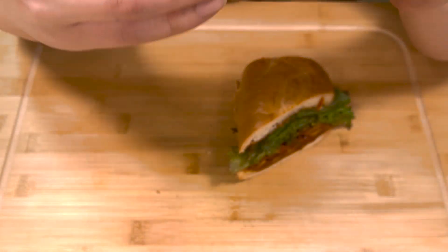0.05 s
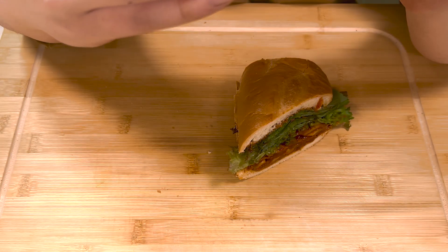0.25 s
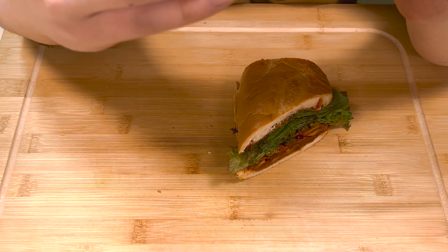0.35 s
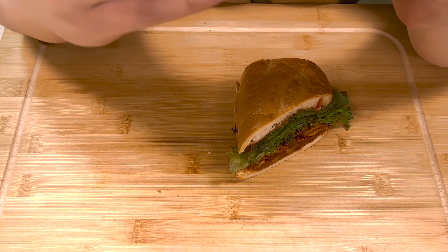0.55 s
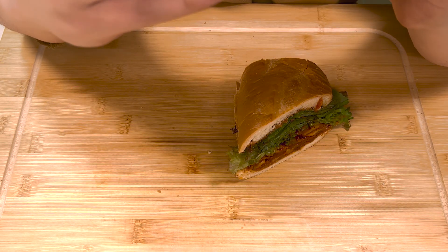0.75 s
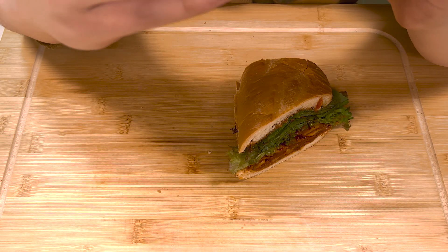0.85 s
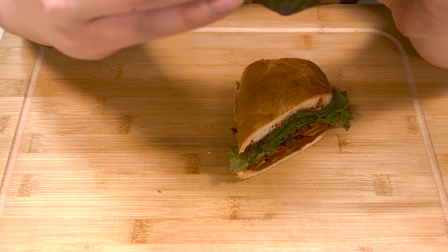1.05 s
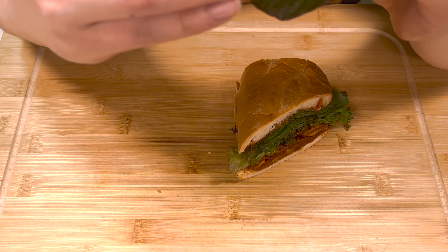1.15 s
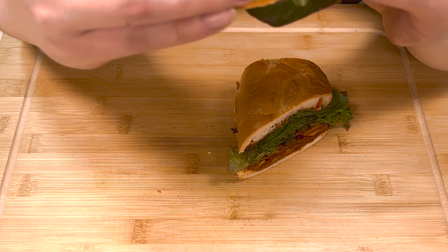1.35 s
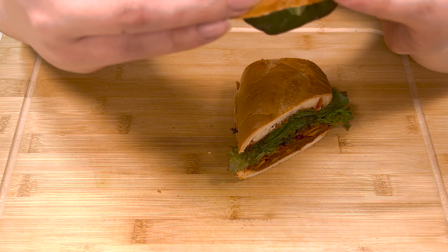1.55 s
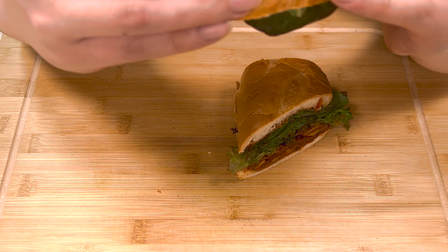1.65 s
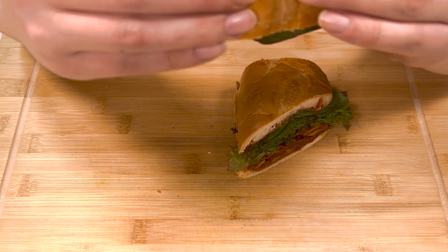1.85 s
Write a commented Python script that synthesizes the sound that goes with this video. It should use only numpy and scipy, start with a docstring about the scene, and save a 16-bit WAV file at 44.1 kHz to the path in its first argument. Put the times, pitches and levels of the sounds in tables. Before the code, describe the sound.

Crusty bread crunches close to the microphone as a sandwich is pressed by hand, first with crisp splintering cracks, then with deeper, sparser snaps that fade. A faint electrical hum lies underneath in the quiet kitchen.

```python
"""A quiet kitchen, the microphone close to two hands squeezing a crusty baguette sandwich.
The crust splits in sharp cracks, each with a knock of the loaf and a spray of splinters, over a bed
of tiny crumbling grains; a second squeeze gives duller, deeper snaps. The room answers briefly.
Two faint tones ring at the start, and mains hum and soft room noise lie underneath."""
import sys
import numpy as np
from scipy import signal
from scipy.fft import rfft, irfft, next_fast_len
from scipy.io import wavfile

SR = 44100
rng = np.random.default_rng(int(sys.argv[2]) if len(sys.argv) > 2 else 0)


def store_wav(level_fs):
    """Save 16-bit WAV to argv[1]."""
    pcm = np.round(np.clip(np.atleast_2d(level_fs), -1, 1) * 32767)
    wavfile.write(sys.argv[1], SR, pcm.T.astype(np.int16))


N = 83790


def amp(db):
    """Decibels to gain."""
    return 10 ** (np.asarray(db) / 20)


def unit(x):
    """Scale to rms 1."""
    return x / np.sqrt(np.mean(x ** 2) + 1e-20)


def along(points, hz):
    """Read a curve of (frequency, value) points on a log-frequency axis."""
    point_hz, values = np.transpose(points)
    return np.interp(np.log(hz + 1), np.log(point_hz + 1), values)


def bump(hz, centre_hz, octaves):
    """A bell-shaped gain on a log-frequency axis."""
    return np.exp(-.5 * (np.log2((hz + 1) / centre_hz) / octaves) ** 2)


def filtered(x, response):
    """Pass x through a filter given as gain against frequency."""
    size = next_fast_len(len(x) + SR // 2)
    hz = np.fft.rfftfreq(size, 1 / SR)
    return irfft(rfft(x, size) * response(hz), size)[:len(x)]


def room_tone(air_db=-58):
    """The kitchen at rest: steady mains hum over soft room noise."""
    # Mains hum partials: pitch_hz, rms_db
    mains = [(60, -61.5), (120, -55), (240, -71.5)]
    # Spectrum of the room noise: frequency_hz, relative_db
    air_curve = [(20, -27), (60, 7), (100, -6), (240, -13), (2000, -34.5), (16000, -26)]
    t = np.arange(N) / SR
    hum = sum(amp(db) * np.sqrt(2) * np.sin(2 * np.pi * (hz * t + rng.random())) for hz, db in mains)
    air = filtered(rng.standard_normal(N), lambda hz: amp(along(air_curve, hz)))
    return hum + amp(air_db) * unit(air)


def kitchen_reverb(direct, level_db=-11, t60_s=0.09, dull_hz=9000):
    """The room's short diffuse answer, 1 ms behind the direct sound and duller."""
    t = np.arange(SR // 2) / SR
    tail = rng.standard_normal(len(t)) * amp(-60 * t / t60_s)
    tail = filtered(tail / np.linalg.norm(tail), lambda hz: 1 / (1 + 1j * hz / dull_hz))
    return amp(level_db) * signal.fftconvolve(direct, np.pad(tail, (SR // 1000, 0)))[:N]


def faint_ring(rise_s=0.011, drift_rad_per_root_s=8.6):
    """Soft-edged tones that waver slightly and die away as the squeeze begins."""
    # Ringing tones: start_s, pitch_hz, level_db, t60_s
    tones = [(0.0, 592, -52.5, 0.49), (0.088, 1997, -34, 0.2)]
    out = np.zeros(N)
    for start_s, pitch_hz, level_db, t60_s in tones:
        t = np.maximum(np.arange(N) / SR - start_s, 0)
        drift = drift_rad_per_root_s * np.cumsum(rng.standard_normal(N)) / np.sqrt(SR)
        envelope = (1 - np.exp(-t / rise_s)) * amp(level_db - 60 * t / t60_s)
        out += envelope * np.sin(2 * np.pi * pitch_hz * t + drift)
    return out


def crust_click(response, size=1024, delay_at_1khz_s=0.000536):
    """A click of energy 1 with a given spectrum; bending waves in the crust bring its lows late."""
    hz = np.fft.rfftfreq(size, 1 / SR)
    cepstrum = irfft(np.log(np.maximum(response(hz), 1e-6)))
    cepstrum[1:size // 2] *= 2  # fold to minimum phase: nothing sounds before the break
    cepstrum[size // 2 + 1:] = 0
    bend_phase = 4 * np.pi * delay_at_1khz_s * np.sqrt(1000 * hz)
    click = irfft(np.exp(rfft(cepstrum) - 1j * bend_phase))
    return click / np.linalg.norm(click)


def fractures(per_s, spread_db, count):
    """Tiny breaks as random impulses of unequal size, rms 1 whatever their rate."""
    sizes = amp(spread_db * np.minimum(rng.exponential(size=count), 4))
    breaks = rng.random(count) < per_s / SR
    signs = rng.choice([-1, 1], count)
    return unit(breaks * sizes * signs / np.sqrt(per_s))


def crumbling(trim_db=-3, thinning=0.27):
    """Crisp flakes and duller crunch: dense under the squeeze, sparser under a light touch."""
    # Course of the crumbling: time_s, flake_db, crunch_db
    course = [(0, -54, -50), (0.19, -47, -46), (0.226, -51.5, -55), (0.235, -35, -43), (0.329, -28.5, -34),
              (0.441, -36.5, -39.5), (0.477, -43.5, -47), (0.505, -31.5, -36.5), (0.6, -35.5, -43.5),
              (0.69, -36.5, -37.5), (0.725, -35.5, -42.5), (0.8, -36.5, -43), (0.858, -41.5, -43.5),
              (0.892, -57, -51.5), (0.948, -40, -42.5), (1.061, -60, -48.5), (1.091, -38.5, -40),
              (1.165, -44.5, -37.5), (1.23, -46.5, -43), (1.285, -57.5, -53), (1.37, -57.5, -54.5),
              (1.403, -41.5, -43.5), (1.445, -47.5, -40), (1.49, -55, -50.5), (1.715, -68.5, -64.5),
              (1.774, -52, -55), (1.84, -60.5, -56.5), (1.9, -57, -50)]
    # Sizes of crisp flake: pitch_hz, relative_db
    flakes = [(3600, -6), (5300, -4.5), (8000, -1.5), (11800, -2), (15000, -6)]
    # Sizes of dull grain: pitch_hz, relative_db
    crunch = [(600, -15.5), (1400, -6), (2200, -1)]
    time_s, flake_db, crunch_db = np.transpose(course)

    def add_grains(grains, level_db, peak_per_s, spread_db, octaves):
        squeeze = amp(np.interp(np.arange(N) / SR, time_s, level_db + trim_db))
        per_s = peak_per_s * (squeeze / squeeze.max()) ** thinning
        for pitch_hz, relative_db in grains:
            force = amp(relative_db) * squeeze * fractures(per_s, spread_db, N)
            grain = crust_click(lambda hz: bump(hz, pitch_hz, octaves))
            out[:] += signal.fftconvolve(force, grain)[:N]

    out = np.zeros(N)
    add_grains(flakes, flake_db, peak_per_s=900, spread_db=4.5, octaves=0.36)
    add_grains(crunch, crunch_db, peak_per_s=800, spread_db=1.5, octaves=0.66)
    return out


def splinters(count=2048, relative_db=-5, t60_s=0.014):
    """Flakes that break just after a crack: a brief, dying spray of impulses."""
    decay = amp(-60 * np.arange(count) / SR / t60_s)
    force = fractures(per_s=4000, spread_db=1.5, count=count) * decay
    return amp(relative_db) * force / np.linalg.norm(force)


def cracks(knock_db=-20, skirt_db=-20):
    """The crust splits: each crack is a sharp click and a soft knock of the loaf, then splinters."""
    # Splits in the crust: start_s, level_db, pitch_hz, width_octaves
    splits = [(0.0037,-12.5,1590,1.02), (0.1662,-15,2410,1.5), (0.2333,-12.5,3170,1.65),
              (0.2508,-3,7200,1.83), (0.2529,-2,5970,0.79), (0.277,-9.5,1900,1.13), (0.3012,-0.5,6330,0.8),
              (0.3238,1.5,7050,1.55), (0.3284,-4,2580,2.3), (0.3409,-4.5,3900,0.74), (0.3637,0.5,6470,0.53),
              (0.3645,-12.5,930,0.92), (0.419,-4,4580,0.3), (0.4274,-1,2470,1.3), (0.4578,-2,5550,0.79),
              (0.4635,-13,1380,1.27), (0.4927,-3.5,2950,1.5), (0.5004,1.5,13780,2.5), (0.5104,1,5600,0.84),
              (0.5148,-5.5,2060,1.4), (0.5535,-4,5100,0.5), (0.583,0,2900,1.58), (0.5897,0,4840,0.51),
              (0.598,-1,3900,0.9), (0.6016,-1,3550,1.51), (0.6083,-2,5200,0.87), (0.6115,-0.5,4870,0.54),
              (0.6168,-3,8800,0.84), (0.6343,-2,5000,1.3), (0.6358,6,7550,1.52), (0.6384,-4.5,5360,0.88),
              (0.6552,-4,2260,1.34), (0.6687,-4.5,3600,1.84), (0.6721,-4,9600,1.9), (0.6834,-9,1430,0.79),
              (0.6881,-3,4700,0.51), (0.7415,-0.5,5570,2.3), (0.8392,-9.5,3880,1.07), (0.9422,-20,5950,2.5),
              (0.9643,-11,3220,0.66), (1.068,-15.5,2220,0.46), (1.08,-10.5,4260,1.04),
              (1.1005,-3.5,2110,1.11), (1.1433,-6.5,2680,0.73), (1.1781,-3.5,2600,0.98),
              (1.1896,-5,2160,0.94), (1.1915,-1,1400,0.65), (1.2085,2.5,2280,0.41), (1.225,-5.5,1780,0.53),
              (1.2304,-9,4040,1.14), (1.3515,-20.5,7000,2), (1.38,-23,2450,0.77), (1.4082,-8,2150,0.38),
              (1.4376,-9,1680,1.19), (1.5176,-20.5,1910,0.64), (1.5568,-16.5,2040,0.75),
              (1.5794,-17,1920,0.77), (1.6409,-28.5,4000,1.6)]

    def skirt(hz):  # the brittle treble that even dull cracks have
        return amp(skirt_db) * bump(hz, centre_hz=10000, octaves=0.38)

    knock = amp(knock_db) * crust_click(lambda hz: bump(hz, centre_hz=910, octaves=1.24))
    out = np.zeros(N + SR)
    for start_s, level_db, pitch_hz, width_octaves in splits:
        force = np.append(1, splinters())
        crust = crust_click(lambda hz: bump(hz, pitch_hz, width_octaves) + skirt(hz))
        snap = signal.fftconvolve(force, crust + knock)
        out[round(start_s * SR):][:len(snap)] += amp(level_db) * rng.choice([-1, 1]) * snap
    return out[:N]


def scene():
    """The bread up close with the kitchen behind it, in mono."""
    bread = cracks() + crumbling()
    return (bread + kitchen_reverb(bread) + faint_ring() + room_tone())[None]


def record(dry, top_hz=16100):
    """One close microphone, with an uneven treble and nothing above top_hz."""
    # Microphone response: frequency_hz, gain_db
    mic_curve = [(300, 0), (1000, 2), (2000, -0.5), (4500, 0.5), (7500, -1.5), (10000, -5.5), (12000, 2),
                 (15500, -4)]
    return filtered(dry[0], lambda hz: amp(along(mic_curve, hz)) * (hz < top_hz))[None]


dry = scene()
out = record(dry)
store_wav(out)
```